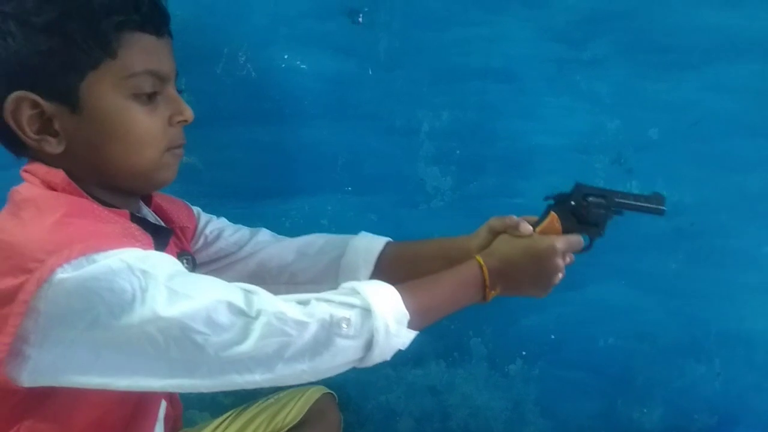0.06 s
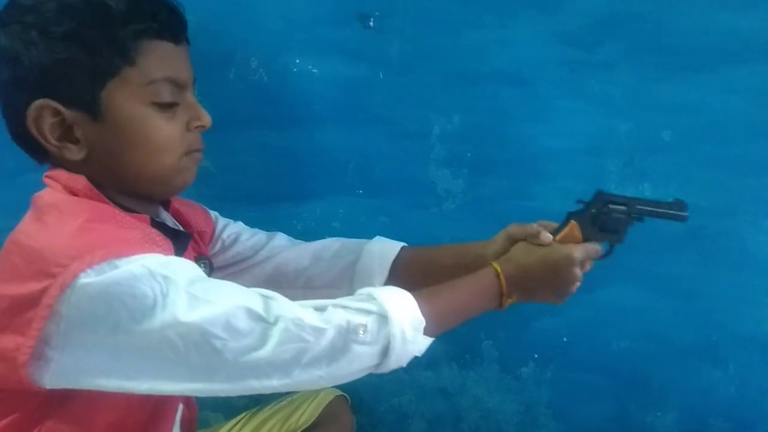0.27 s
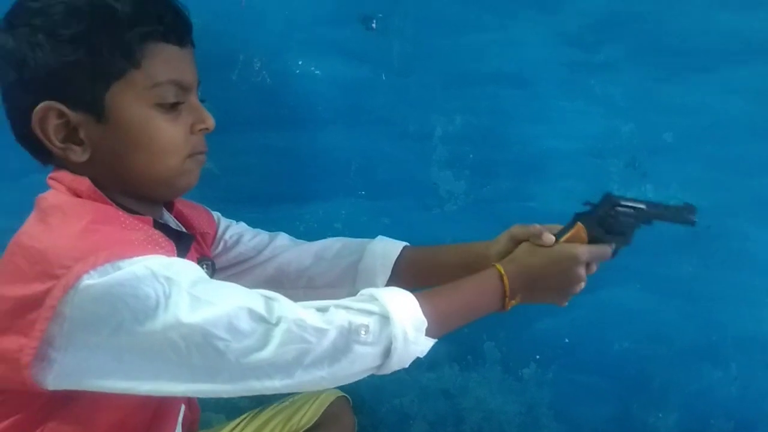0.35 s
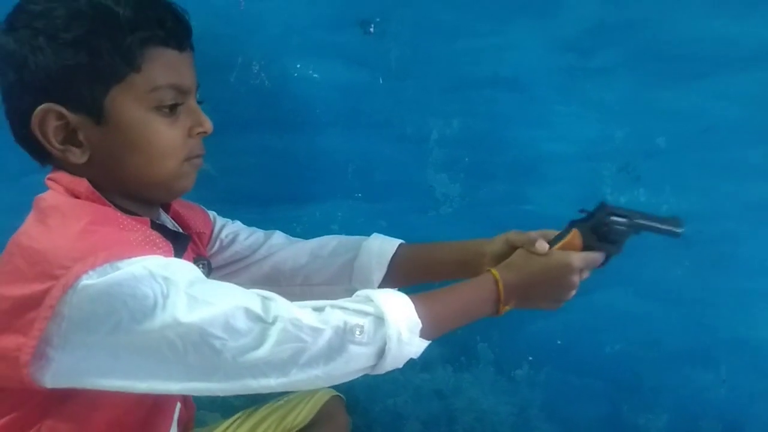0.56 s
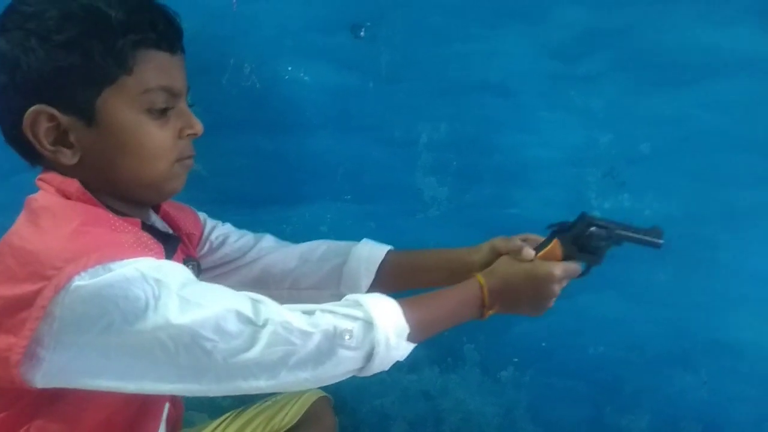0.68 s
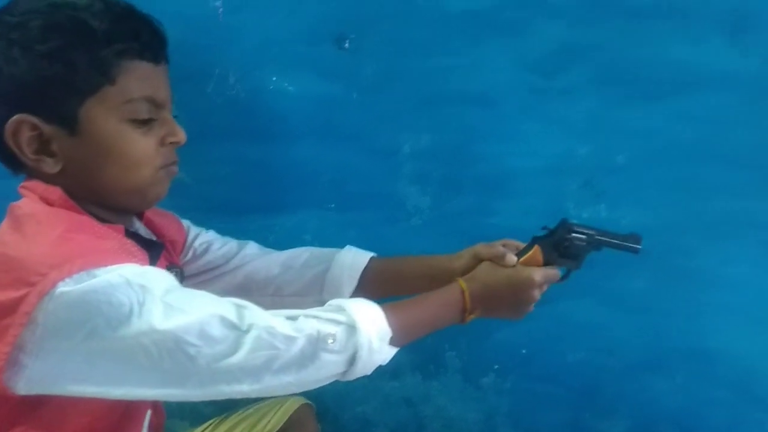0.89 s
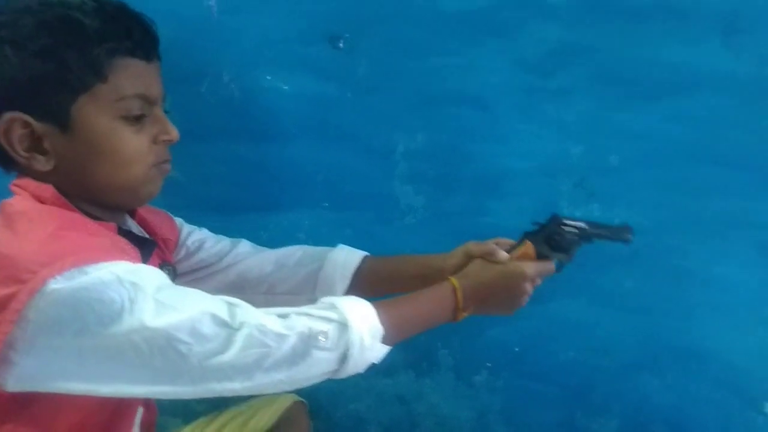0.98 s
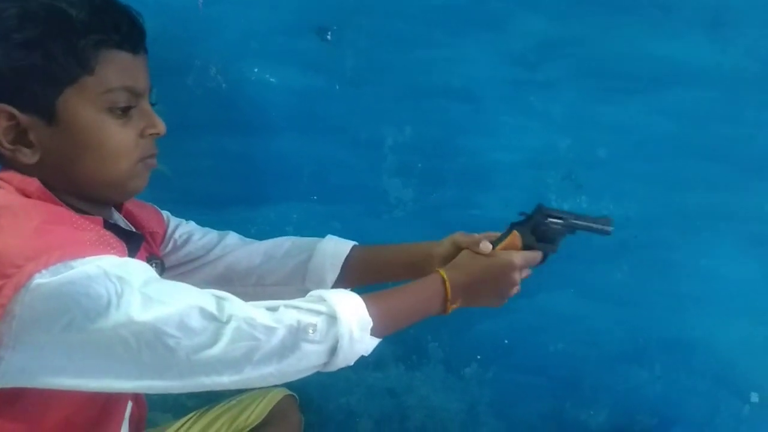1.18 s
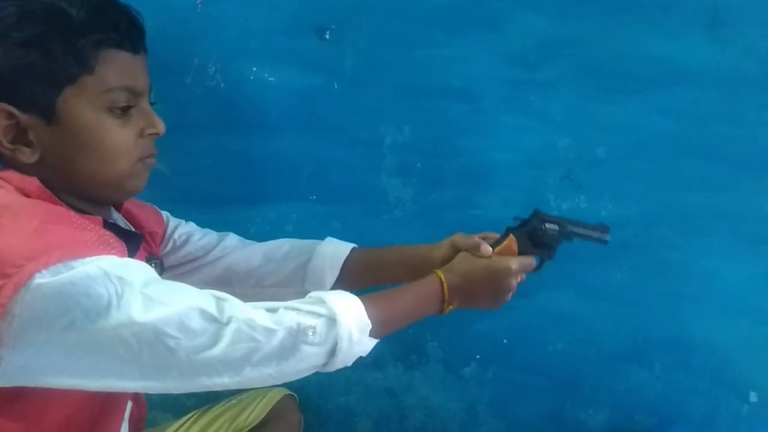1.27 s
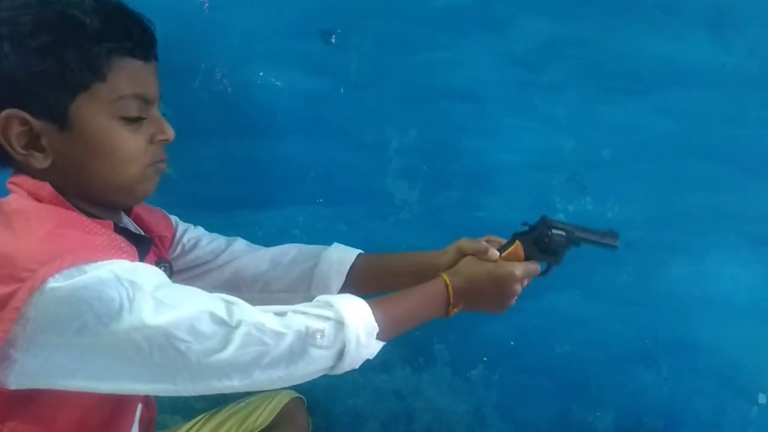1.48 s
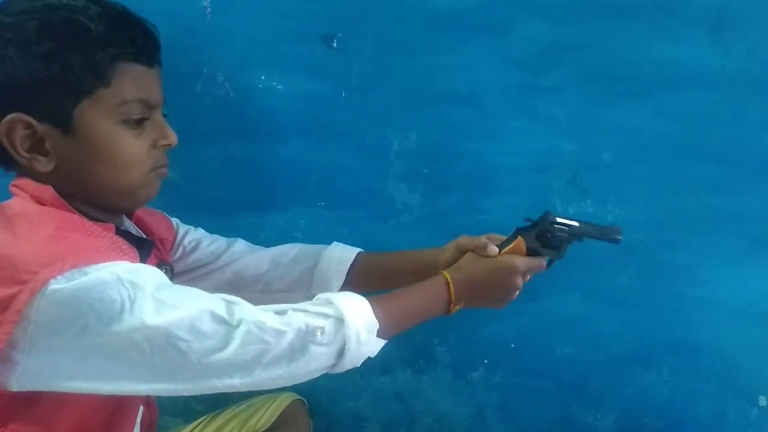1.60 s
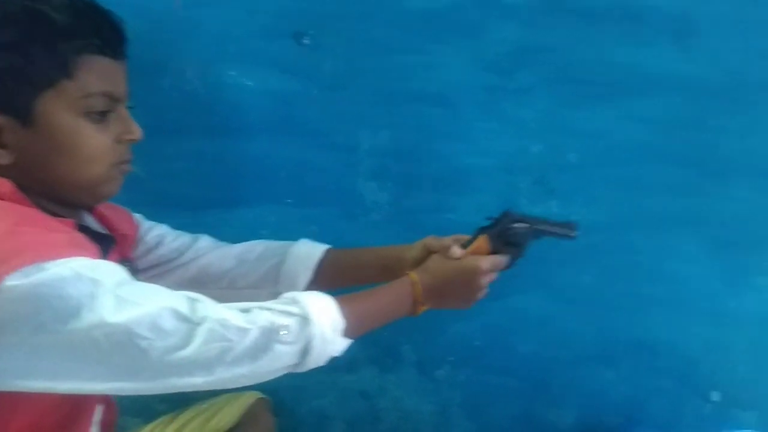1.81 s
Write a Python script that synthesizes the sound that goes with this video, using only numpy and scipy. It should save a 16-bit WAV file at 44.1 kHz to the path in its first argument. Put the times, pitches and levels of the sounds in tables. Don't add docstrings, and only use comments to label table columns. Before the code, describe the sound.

Two bright cap-gun cracks over a second apart, crisp metal clicks between and one after, short hard-wall echo, low far motor and street wash, faint finger creaks on the phone, wide stereo.

```python
import sys
import numpy as np
from scipy import signal
from scipy.fft import rfft, irfft
from scipy.io import wavfile
from scipy.ndimage import uniform_filter1d

SR = 44100
rng = np.random.default_rng(int(sys.argv[2]) if len(sys.argv) > 2 else 0)


def invert_db(x):
    u = np.asarray(x, float) / 20
    return 10 ** u


def unload_wav(signal):
    wavfile.write(
        sys.argv[1],
        SR,
        np.round(np.clip(np.atleast_2d(signal).T, -1, 1) * 32767).astype(np.int16),
    )


N = 81585


def curve(table, at, warp=lambda v: v):
    return np.interp(warp(at), warp(np.array(table)[:, 0]), np.array(table)[:, 1])


def colour(x, table):
    hz = np.maximum(np.arange(2049) * SR / 4096, 1)
    cepstrum = irfft(curve(table, hz, np.log) * np.log(10) / 20)
    cepstrum[1:2048] *= 2
    cepstrum[2049:] = 0
    response = irfft(np.exp(rfft(cepstrum)))
    return signal.fftconvolve(x, response)[:len(x)]


def band(x, order, hz, kind):
    return signal.sosfilt(signal.butter(order, hz, kind, fs=SR, output="sos"), x)


def add(out, x, start_s):
    i = int(start_s * SR)
    out[..., i:i + x.shape[-1]] += x[..., :N - i]


def decay(t, t60_s):
    return np.exp(-np.log(1000) * t / t60_s)


def sine(hz):
    return np.sin(2 * np.pi * np.cumsum(hz) / SR)


def ports(common, diff):
    return np.array([common + diff, common - diff])


def walk(rate_hz):
    k = int(SR / rate_hz)
    steps = np.repeat(rng.standard_normal(size=999), k)[:N]
    return 1.2 * uniform_filter1d(uniform_filter1d(steps, k), k)


# pitch_hz, level_db
STREET_COMMON = [(25, -6.5), (70, 7), (150, 5), (400, -9.5), (1200, -16), (3000, -22), (7000, -31.5),
                 (14000, -39)]
STREET_DIFFERENCE = [(30, -26), (70, -3.5), (180, -9), (500, -17.5), (1200, -13), (3000, -20),
                     (7000, -31.5), (14000, -38)]
# time_s, level_db
STREET_SWELL = [(0, -63), (.3, -63.5), (.7, -58.5), (1.0, -62), (1.3, -61.5), (1.45, -54), (1.85, -62)]


def traffic(t):
    common, diff = (colour(rng.standard_normal(N), shape) * invert_db(1.5 * walk(12))
                    for shape in (STREET_COMMON, STREET_DIFFERENCE))
    return ports(common, diff) * invert_db(curve(STREET_SWELL, t) + 16)


# pitch_hz, level_db
MOTOR_LINES = [(48.4, -61.5), (118.4, -75.5), (145.3, -75), (193.8, -66.5), (290.7, -78)]
# time_s, level_db
MOTOR_SWELL = [(0, -23.5), (.45, -19.5), (.7, -15.5), (1.0, -13.5), (1.25, -9), (1.45, -14), (1.55, -17.5),
               (1.85, -22)]


def motor(t):
    hum = np.zeros(N)
    for hz, db in MOTOR_LINES:
        hum += invert_db(db + 5 + 1.5 * walk(9)) * sine(hz * (1 + .003 * walk(5)))
    return invert_db(14.5 + curve(MOTOR_SWELL, t)) * hum


# start_s, length_s, pitch_hz, level_db
FAR_WHISTLES = [
    (1.335, .1, 4550, -67),
    (0.0, .045, 4150, -71),
    (-.05, .28, 435, -68),
]


def whistles(t):
    out = np.zeros(N)
    for start_s, length_s, hz, db in FAR_WHISTLES:
        swell = invert_db(db + 3 * walk(90)) * np.sin(np.pi * np.clip((t - start_s) / length_s, 0, 1))
        out += swell * sine(hz * (1 + .008 * walk(40)))
    return out * np.array([[1], [.4]])


# start_s, length_s, level_db, first_slip_hz, last_slip_hz
CASE_CREAKS = [
    (.9425, .047, -42, 215, 330),
    (1.066, .008, -53, 300, 200),
    (1.1705, .0045, -40, 230, 230),
    (1.283, .012, -57, 200, 200),
    (1.4525, .02, -39, 235, 225),
]


def creaks():
    out = np.zeros(N)
    for start_s, length_s, db, first_hz, last_hz in CASE_CREAKS:
        u = np.arange(int(length_s * SR)) / (length_s * SR)
        slip_hz = (first_hz + (last_hz - first_hz) * u ** 3) * (1 + 0.051 * walk(200)[:len(u)])
        phase = np.cumsum(slip_hz) / SR % 1
        saw = 2 * phase ** 1.1 - 1.18
        add(out, invert_db(db) * saw * (1 - 0.37 * u ** 4), start_s)
    out = band(out, 1, [45, 800], "band")
    return ports(0.37 * out, out / 2)


# pitch_hz, level_db
WALL_COMMON = [(60, -8), (300, 1), (900, -5), (2300, 2.5), (4000, -4), (7500, -6.5), (12000, -9),
               (16000, -27.5)]
WALL_DIFFERENCE = [(60, -22.5), (300, -19), (900, -5.5), (2300, 2.5), (4000, -4), (7500, -7.5), (12000, -9),
                   (16000, -24)]
# pitch_hz, t60_s
WALL_FADE = [(100, 0.1), (400, 0.37), (1000, 0.57), (2500, 0.52), (6000, 0.55), (12000, 0.36)]


def walls():
    t = np.arange(SR) / SR
    hz = np.maximum(np.fft.rfftfreq(SR, 1 / SR), 1)
    early_db, early_t60_s, rise_s = -0.5, 0.12, .0015
    early = invert_db(early_db) * decay(t, early_t60_s) * rng.exponential(size=SR)
    grain = rng.standard_normal((2, SR)) * (1 + early)
    tail = np.zeros((2, SR))
    for centre_hz in 50 * 2. ** np.arange(9):
        share = np.clip(1 - np.abs(np.log2(hz / centre_hz)), 0, 1)
        tail += irfft(rfft(grain) * share) * decay(t, curve(WALL_FADE, centre_hz, np.log))
    tail *= 1 - np.exp(-t / rise_s)
    return ports(colour(tail[0], WALL_COMMON), colour(tail[1], WALL_DIFFERENCE))


# start_s, level_db, brightest_hz, rattle_s, hardest_knock (0-1 along the rattle)
GUN_CLICKS = [(0.077, -43, 3600, 0.003, .3), (.1047, -53, 4130, .004, .3), (.4845, -25.5, 6740, 0.0063, .1),
              (.7517, -53, 3510, .004, .3), (.7906, -49, 5700, .005, .3), (0.873, -21.5, 5870, 0.0055, .55),
              (.8815, -38.5, 5500, 0.0052, .1), (1.1262, -39, 6960, .002, .3),
              (1.1287, -19, 7150, 0.006, 0.07), (1.4047, -51, 3560, .005, .3),
              (1.731, -26.5, 7850, 0.0043, .2)]
# pitch_hz, level_db, t60_s
GUN_MODES = [(2300, -5, .015), (3122, -1, .016), (3682, -4, .018), (4813, -5, .018), (5200, -4, .016),
             (6100, -5, .015), (7090, -3, .018), (7550, -1, .012), (8969, -3, .012), (10200, -8, .012),
             (11790, -11, .012), (13000, -9, .012), (1500, -13, .015), (900, -12, .015)]


def metal_knock(t, top_hz, late):
    hz, mode_db, t60_s = np.array(GUN_MODES).T[:, :, None]
    pitch = hz * (1 + 0.039 * rng.standard_normal(hz.shape))
    octaves = np.log2(hz / top_hz / (1.15 - .45 * late))
    gain = invert_db(mode_db - 8 * octaves ** 2 + 2 * rng.standard_normal(hz.shape))
    tones = np.sin(2 * np.pi * (pitch * t + rng.random(hz.shape)))
    return (gain * tones * decay(t, t60_s * .33)).sum(0)


def clicks():
    out, source, t = np.zeros((2, N)), np.zeros(N), np.arange(SR // 20) / SR
    knocks, far_port_db, slope_db = 14, -2, -15
    for start_s, db, top_hz, rattle_s, peak in GUN_CLICKS:
        when = rng.random(knocks) * np.sign(np.arange(knocks))
        for port in range(2):
            body = np.zeros(len(t))
            for late, size in zip(when, rng.random(knocks)):
                k = int(late * rattle_s * SR)
                force = (.3 + size) * np.exp(-((late - peak) / .5) ** 2)
                body[k:] += force * metal_knock(t, top_hz, late)[:len(t) - k]
            add(out[port], body / np.abs(body).max() * invert_db(db + port * far_port_db), start_s)
        bump = [(top_hz / 10, 1.7 * slope_db), (top_hz / 2, .5 * slope_db),
                (top_hz * 1.2, 0), (top_hz * 2, .2 * slope_db)]
        add(source, invert_db(db) * colour(1. * (t == 0), bump), start_s + peak * rattle_s)
    return band(out, 2, 700, "high"), source


# start_s, level_db, thump_db, thump_hz
CAP_SHOTS = [
    (0.2327, -2, -9, 231.3),
    (1.4732, -4.5, -7.5, 184),
]
# pitch_hz, level_db
BLAST_COLOUR = [(60, -51), (300, -26.5), (900, 8), (2300, -4.5), (5000, 1), (9000, -4.5), (13000, -9.5),
                (16000, -19)]


def blast(t):
    blast_s, spit_s, spit_db, far_port_db = 0.00043, 0.0088, 0.5, -7.5
    wave = np.where(t < blast_s, 1 - 2 * t / blast_s, 0)
    grains = rng.standard_normal((2, len(t))) * rng.exponential(size=(2, len(t)))
    spit = invert_db(spit_db) * grains * decay(t, 3 * spit_s) / 2
    return invert_db([[0], [far_port_db]]) * np.array([colour(wave + v, BLAST_COLOUR) for v in spit])


def case_thump(t, hz):
    sag = 0.34 + 0.63 * np.exp(-t * 75)
    tone = sine(hz * sag * (1 + 0.36 * walk(130)[:len(t)]))
    rumble = band(rng.standard_normal((2, len(t))), 2, [40, 200], "band")
    ring = (tone + invert_db(18.5) * rumble) * decay(t, 0.071)
    return ports(0.73 * ring[0], -.55 * ring[1])


def shots():
    out, source, t = np.zeros((2, N)), np.zeros(N), np.arange(SR // 10) / SR
    for start_s, db, thump_db, thump_hz in CAP_SHOTS:
        add(out, invert_db(db) * blast(t), start_s)
        add(source, invert_db(db) * (t == 0), start_s)
        add(out, invert_db(thump_db) * case_thump(t, thump_hz), start_s)
    return out, source


def scene():
    t = np.arange(N) / SR
    street = traffic(t) + motor(t) + whistles(t)
    ticks, tick_source = clicks()
    bangs, shot_source = shots()
    send = invert_db(-11.5) * shot_source + invert_db(-20) * tick_source
    echo = np.array([signal.fftconvolve(send, wall)[:N] for wall in walls()])
    return street + creaks() + echo + ticks + bangs


def top_cut(x):
    return signal.sosfilt(signal.butter(12, 15220, fs=SR, output="sos"), x)


def record(dry):
    lag, cross_gain, ceiling = 20, .86, 1.2
    other = np.pad(dry[::-1], ((0, 0), (lag, 0)))[:, :N]
    late = band(other, 1, 7000, "low")
    wide = ceiling * np.tanh((dry - cross_gain * late) / ceiling)
    wide = signal.sosfilt(signal.cheby1(8, .3, 14050, fs=SR, output="sos"), wide)
    return top_cut(wide)


dry = scene()
out = record(dry)
unload_wav(out)
```